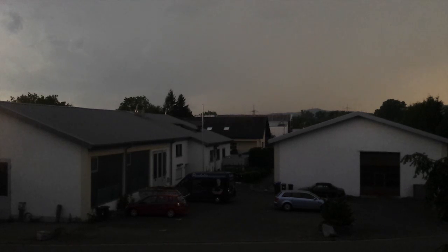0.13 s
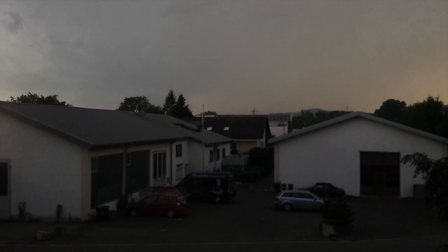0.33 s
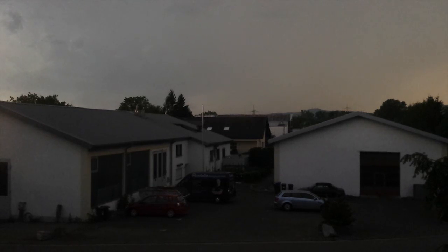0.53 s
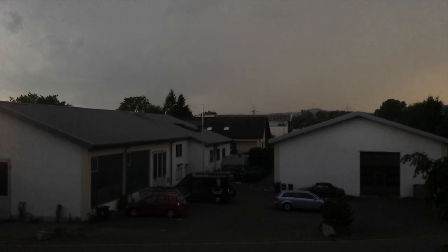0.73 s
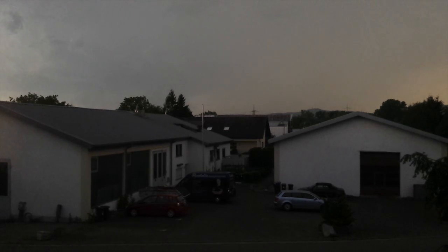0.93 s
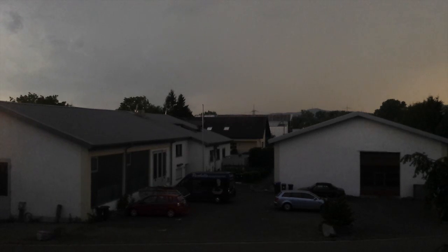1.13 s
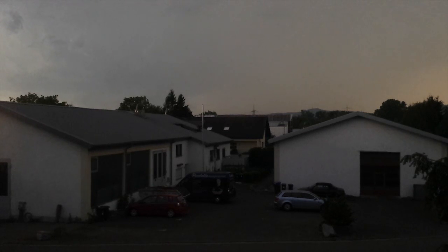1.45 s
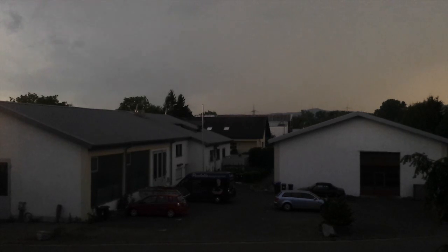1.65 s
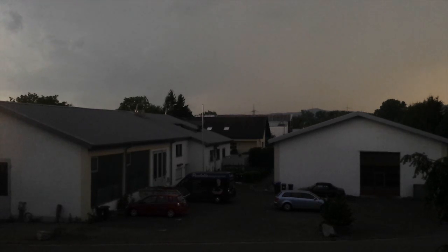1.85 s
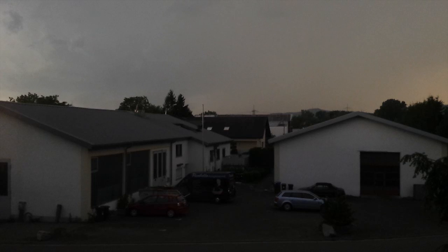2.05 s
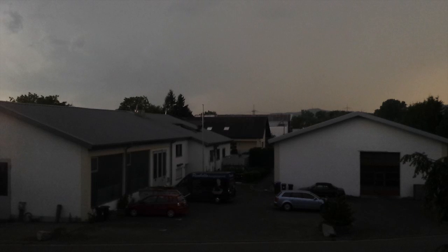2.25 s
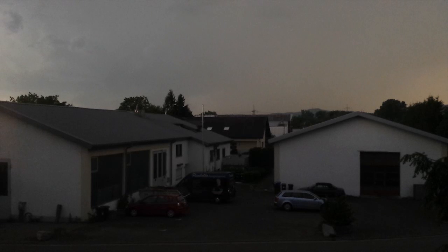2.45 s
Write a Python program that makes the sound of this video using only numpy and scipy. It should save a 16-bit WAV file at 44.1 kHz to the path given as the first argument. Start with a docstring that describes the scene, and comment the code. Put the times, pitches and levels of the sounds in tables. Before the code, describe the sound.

Distant thunder rolls in, swells to a heavy dull boom, then dies away unevenly over houses

```python
"""A quiet street with houses: faint outdoor wash, microphone hiss and a thin whine run throughout.
Distant thunder rolls in, crowds of dull pressure pulses ringing in the resonances of the walls.
It swells to one heavy boom, made of three short decaying low tones; two tiny ticks of filtered noise
follow close to the microphone. Then the roll, a hollow resonance and a deep shudder die away unevenly."""
import sys
import numpy as np
from scipy import signal
from scipy.fft import rfft, irfft
from scipy.io import wavfile
from scipy.ndimage import uniform_filter1d

SR = 44100
rng = np.random.default_rng(int(sys.argv[2]) if len(sys.argv) > 2 else 0)


def to_wav(s):
    """Save 16-bit WAV."""
    ch = np.atleast_2d(s).T  # columns
    pcm = np.round(np.clip(ch, -1, 1) * 32767)  # PCM
    wavfile.write(sys.argv[1], SR, pcm.astype(np.int16))


N = 114660  # samples
T, HZ = np.arange(N) / SR, np.fft.rfftfreq(N, 1 / SR)  # time axis in s, frequency axis in Hz


def amp(db):
    """Decibels to gain."""
    return 10 ** (np.asarray(db) / 20)


def unit(x):
    """Scales to an rms of one, taken over all channels together."""
    return x / np.sqrt(np.mean(x ** 2) + 1e-20)


def over_hz(points):
    """Reads a spectrum on a log-frequency axis."""
    hz, value = np.transpose(points)
    return np.interp(np.log(HZ + 1), np.log(hz + 1), value)


def over_time(points):
    """Reads a curve at every sample."""
    return np.interp(T, *np.transpose(points))


def shaped(x, gain):
    """Filters by a gain for each frequency."""
    return irfft(rfft(x) * gain, N)


def pan(left_minus_right_db):
    """Left and right gains for a level difference."""
    return amp(np.array([[.5], [-.5]]) * left_minus_right_db)


def outdoor_wash():
    """Diffuse distant wash: independent noise left and right, coloured and balanced by frequency."""
    # colour of the wash: pitch_hz, relative_db
    wash_colour = [(200, -34), (500, 6.5), (750, 1.5), (860, 3), (1000, 0.5), (1300, -2), (1550, 1),
                   (1850, 1.5), (2150, -19), (3000, -16), (5000, -31)]
    # balance between the ears: pitch_hz, left_minus_right_db
    wash_balance = [(500, 7), (800, -4), (1050, 3.5), (1400, 9.5), (2000, 0), (4000, 22)]
    # slow drift of the wash: time_s, level_db
    wash_level = [(0, -72), (.17, -68), (.32, -66), (.9, -63), (1.5, -63.5), (1.9, -62), (2.22, -60),
                  (2.41, -63), (2.6, -61.5)]
    noise = rng.standard_normal((2, N))
    wash = unit(shaped(noise, amp(over_hz(wash_colour)) * pan(over_hz(wash_balance))))
    return wash * amp(over_time(wash_level))


def microphone_hiss():
    """Microphone hiss: independent coloured noise in each channel."""
    # colour of the hiss: pitch_hz, relative_db
    hiss_colour = [(100, -17), (2000, -2), (3200, -4.5), (5400, -3.5), (6300, -1), (7200, -1.5), (8300, -5),
                   (10000, -6), (14500, -6.5)]
    # slow drift of the hiss: time_s, level_db
    hiss_level = [(0, -66.5), (.16, -65), (.28, -62), (.6, -60.5), (.9, -59.5), (1.2, -58.5), (1.45, -59.5),
                  (2.18, -59.5), (2.4, -62.5), (2.6, -61.5)]
    hiss = unit(shaped(rng.standard_normal((2, N)), amp(over_hz(hiss_colour))))
    return hiss * pan(-1.4) * amp(over_time(hiss_level))


def whine():
    """A faint thin whine: one steady sine, the same in both channels."""
    whine_hz, whine_rms_db = 7450, -88
    return amp(whine_rms_db) * unit(np.sin(2 * np.pi * whine_hz * T))


def tick(start_s, onset_db, pitch_hz, width_octaves, decay_s, pan_db):
    """A tiny bright tap near the microphone: band-filtered noise that starts abruptly and decays."""
    octaves_away = np.log2((HZ + 1) / pitch_hz)
    ring = unit(shaped(rng.standard_normal((2, N)), np.exp(-.5 * (octaves_away / width_octaves) ** 2)))
    decay = (T >= start_s) * np.exp(-np.maximum(T - start_s, 0) / decay_s)
    return ring * pan(pan_db) * amp(onset_db) * decay


def ticks():
    """The tiny taps close by, added together."""
    # each tap: start_s, onset_rms_db, pitch_hz, width_octaves (standard deviation), decay_s,
    # left_minus_right_db
    tick_rows = [(1.1992, -54, 6400, 0.18, 0.0068, -3), (1.2884, -43, 5520, 0.28, 0.0022, -1)]
    return sum(tick(*row) for row in tick_rows)


def pulses():
    """A crowd of pressure pulses of random size and sign from along the lightning channel."""
    pulses_per_s, spread_db = 2200, 0.5
    size = amp(spread_db * np.minimum(rng.exponential(1, N), 4))
    arrives = rng.random(N) < pulses_per_s / SR
    return rng.standard_normal(N) * size * arrives


def steadied(x):
    """Evens out chance swells and dips by dividing by part of the smoothed level; rms one."""
    smooth_s, steadiness = 0.058, 0.63  # steadiness: 0 leaves the swells, 1 divides them out fully
    size = max(int(smooth_s * SR), 2)
    power = uniform_filter1d(uniform_filter1d(unit(x) ** 2, size), size // 2)
    return unit(x / (abs(power) + 1e-6) ** (steadiness / 2))


def spread(mid, side):
    """Left and right as sum and difference of direct sound and sound scattered from the sides."""
    # strength of the scattered sound: pitch_hz, side_minus_mid_db
    scatter = [(25, -7), (70, -19), (160, -17.5), (300, -9.5), (500, -8.5), (900, -20)]
    side = shaped(side, amp(over_hz(scatter)))
    return np.array([mid + side, mid - side])


def shudder():
    """The deepest part of the thunder: pulses in one narrow low resonance, alike in both channels."""
    # rise and fall of the shudder: time_s, level_db
    shudder_level = [(0.0, -64), (0.54, -54), (0.6, -66), (1.43, -46), (1.52, -55), (1.7, -55), (1.76, -64),
                     (2.6, -67)]
    centre_hz, width_hz = 29.7, 2.1  # width: two standard deviations
    ring = shaped(pulses(), np.exp(-.5 * ((HZ - centre_hz) / (width_hz / 2)) ** 2))
    return steadied(ring) * amp(over_time(shudder_level))


def resonate(x, hz, width_hz):
    """A resonance of gain one whose centre follows a curve."""
    turn = np.exp(2j * np.pi * np.cumsum(hz) / SR)
    r = np.exp(-np.pi * width_hz / SR)
    # shift the centre down to zero, low-pass there, then shift back up
    low = signal.lfilter([1 - r], [1, -r], x / turn)
    return 2 * (turn * low).real


def hollow():
    """The strongest resonance between the houses gives the roll its booming pitch."""
    # drifting centre of the resonance: time_s, pitch_hz
    hollow_centre = [(0, 152), (1.02, 150), (1.17, 160), (1.46, 153), (1.6, 166.5), (2.6, 168.5)]
    # rise and fall of the resonance: time_s, level_db (direct sound, before the scattered sound)
    hollow_level = [(0.0, -70), (0.04, -56), (0.09, -62), (0.19, -58.5), (0.26, -38.5), (0.31, -34.5),
                    (0.34, -64), (0.36, -42), (0.74, -37), (0.82, -46), (0.95, -35.5), (1.04, -46),
                    (1.18, -36), (1.29, -43.5), (1.31, -39.5), (1.56, -44.5), (1.59, -38), (2.11, -48),
                    (2.25, -43), (2.29, -52.5), (2.58, -48.5), (2.6, -65)]
    hz, width_hz = over_time(hollow_centre), 21.7  # width of each of two passes

    def ring():
        """One crowd of pulses through the resonance twice."""
        return steadied(resonate(resonate(pulses(), hz, width_hz), hz, width_hz))

    return spread(ring(), ring()) * amp(over_time(hollow_level))


def roll():
    """Dull pulses ring between the walls; bass, body and upper edge each swell on their own curve."""
    # colour of the thunder: pitch_hz, relative_db
    thunder_colour = [(15, -38), (40, -16.5), (75, -10), (120, -7), (200, -7.5), (280, -8.5), (370, -15),
                      (465, -20.5), (520, -17.5), (620, -25.5), (780, -39), (1100, -53)]
    # resonances of the walls: pitch_hz, width_hz (at half the lift), lift_db
    walls = [(53.6, 6.3, 11), (71.7, 4.4, 4.5), (86.1, 8.2, 12.5), (213.5, 10.2, 8.5), (223, 8.9, 8.5),
             (261.1, 12.4, 8.5), (294.7, 7.7, 6.5), (335.2, 10.7, 10), (374, 14.5, 6), (406, 3, 9),
             (435.2, 16.5, 11.5), (496, 20, 4.5)]
    # bass, body and upper edge: low_hz, high_hz, trim_db, left_minus_right_db
    bands = [(45.5, 158, 1, 0), (184, 302.7, -1, -1), (317.6, 940, -1, -1)]
    # rise and fall of each band: time_s, level_db (direct sound, before trim_db and pan)
    bass_level = [(0.0, -58.5), (0.18, -60), (0.21, -49.5), (0.38, -40), (0.41, -53), (0.52, -39.5),
                  (1.01, -48.5), (1.05, -42), (1.09, -54), (1.14, -41), (1.52, -46), (1.57, -42.5),
                  (1.63, -47), (1.69, -37.5), (1.72, -47), (1.88, -48), (2.21, -48), (2.35, -48.5),
                  (2.4, -55), (2.45, -48), (2.5, -51), (2.6, -56)]
    body_level = [(0.0, -60), (0.17, -60.5), (0.31, -41), (0.33, -44), (0.65, -38), (0.77, -44),
                  (0.93, -45), (0.94, -38), (1.1, -39.5), (1.18, -32), (1.23, -40.5), (1.49, -38),
                  (1.61, -45.5), (1.64, -41), (1.75, -51), (1.8, -40), (1.93, -48.5), (2.0, -36),
                  (2.11, -53.5), (2.15, -42.5), (2.22, -52.5), (2.6, -55)]
    upper_level = [(0.0, -70.5), (0.18, -69), (0.21, -59.5), (0.36, -52), (0.38, -52.5), (0.64, -48.5),
                   (0.72, -51.5), (0.95, -49.5), (1.13, -52), (1.17, -46), (1.22, -50.5), (1.37, -46.5),
                   (1.82, -54.5), (1.84, -47.5), (2.32, -60.5), (2.6, -60.5)]

    lift = sum(db / (1 + (2 * (HZ - hz) / width) ** 2) for hz, width, db in walls)
    colour = amp(over_hz(thunder_colour) + lift)
    direct, scattered = pulses(), pulses()
    out = np.zeros((2, N))
    for level, (low_hz, high_hz, trim_db, pan_db) in zip((bass_level, body_level, upper_level), bands):
        low_cut = 1 + (low_hz / (HZ + 1)) ** 24
        high_cut = 1 + (HZ / high_hz) ** 24
        band = colour / np.sqrt(low_cut * high_cut)
        both = spread(steadied(shaped(direct, band)), steadied(shaped(scattered, band)))
        out += both * pan(pan_db) * amp(over_time(level) + trim_db)
    return out


def boom(start_s, peak_db, pitch_hz, rise_s):
    """One stronger wave front: a few low cycles that swell and die."""
    t = np.maximum(T - start_s, 0)
    swell = (t / rise_s * np.exp(1 - t / rise_s)) ** 2
    return amp(peak_db) * swell * np.sin(2 * np.pi * pitch_hz * t)


def booms():
    """The single booms that stand out of the roll, added together."""
    # each boom: start_s, peak_db (of the envelope, before the thunder's pan), pitch_hz, rise_s
    boom_rows = [(1.125, -25.5, 230, 0.0027), (1.161, -29.5, 175, 0.0058), (1.174, -23, 200, 0.0039)]
    return sum(boom(*row) for row in boom_rows)


def scene():
    """Thunder over the quiet street, with the background and the close ticks."""
    background = outdoor_wash() + microphone_hiss() + whine()
    thunder = roll() + hollow() + shudder() + booms()
    return background + ticks() + thunder * pan(-0.3)


def record(dry):
    """The recorder's band limit: a steep low-pass without delay."""
    edge_hz = 14600
    low_pass = signal.firwin(1023, edge_hz, window=("kaiser", 9), fs=SR)
    return signal.oaconvolve(dry, low_pass[None], "same")


dry = scene()
out = record(dry)
to_wav(out)
```